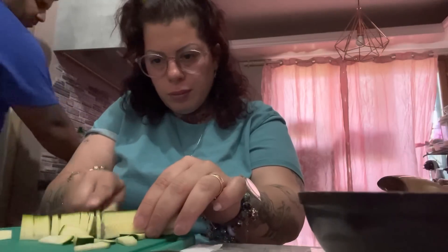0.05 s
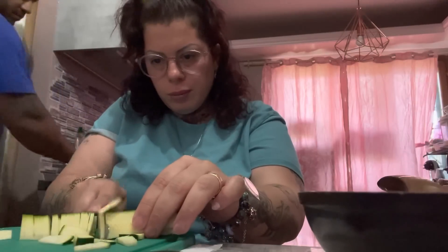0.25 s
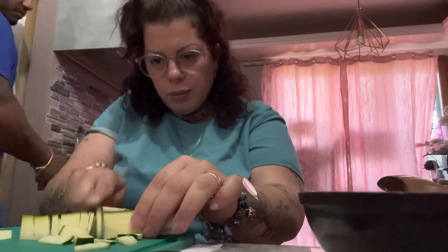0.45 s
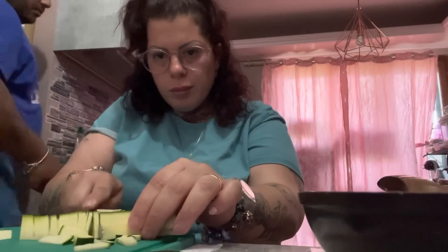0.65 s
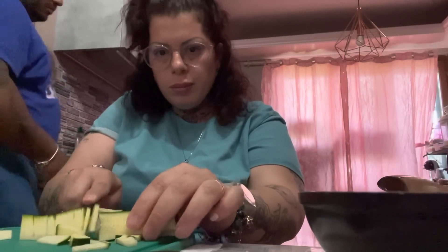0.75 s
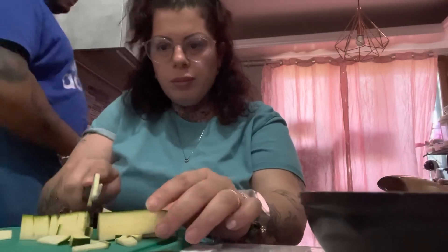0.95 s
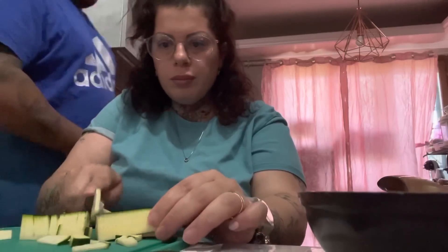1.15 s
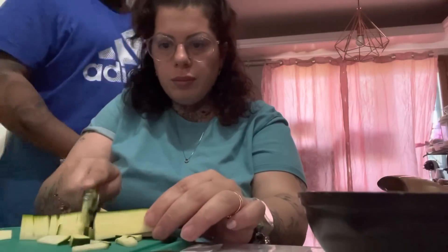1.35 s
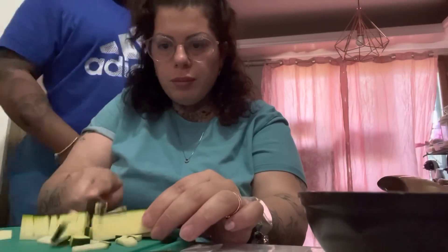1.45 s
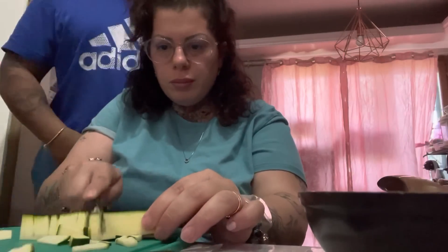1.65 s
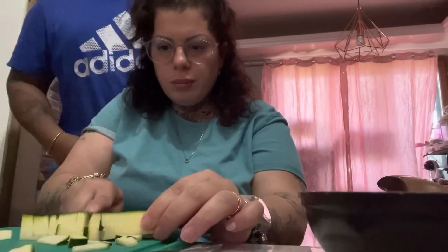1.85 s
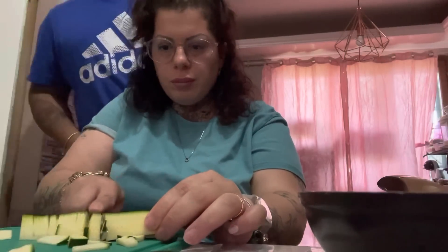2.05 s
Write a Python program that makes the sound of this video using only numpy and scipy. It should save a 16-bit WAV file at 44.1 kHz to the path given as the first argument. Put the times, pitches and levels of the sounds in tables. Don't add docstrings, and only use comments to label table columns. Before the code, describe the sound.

Very close stereo microphone by a cutting board: a fading chop, two quick crunchy knocks, a quiet gap, a heavy chop and a last duller one as a hollow vessel is set down in the kitchen behind.

```python
import sys
import numpy as np
from scipy import signal
from scipy.fft import rfft, irfft, next_fast_len
from scipy.io import wavfile
from scipy.ndimage import uniform_filter1d

SR = 44100
rng = np.random.default_rng(int(sys.argv[2]) if len(sys.argv) > 2 else 0)


def master(y):
    cut = np.clip(np.atleast_2d(y).T, -1, 1)
    pcm = np.round(cut * 32767)
    wavfile.write(sys.argv[1], SR, pcm.astype(np.int16))


def magnitude_from_level(level_db):
    exponent = np.asarray(level_db, float) / 20
    return 10 ** exponent


N = 92610

# start_s, room_db, low_mode_db
CHOPS = [
    (-.03, 6, 0),
    (0.2472, 5.5, -21),
    (0.4892, 3.5, 4),
    (1.2133, 6, 11),
    (1.7793, 2.5, 8),
]
# peak_db, brightness_db_per_octave, treble_db
CHOP_LEVELS = ((-2, 0, 0), (-.5, 1, -14), (-1.5, 0, -3), (-1.3, 1.5, 3), (-9.5, -7.5, 9))
# pitch_hz, level_db, t60_s
BOARD_MODES = [(742, -17, 0.046), (1215, 6, 0.015), (1956, 1, 0.014), (2430, -10, 0.014),
               (2750, -12, 0.009), (3050, -9.5, 0.0066), (3783, -18.5, 0.011), (4300, -23, 0.011),
               (5330, -29.5, 0.0087), (6414, -20, 0.0078), (8020, -18.5, 0.0067), (11000, -27, 0.0013)]
# start_s, length_s, level_db,
# centre_hz, width_octaves
SLICES = [(0.185, 0.025, -50, 2045, 1.4), (0.213, 0.0098, -34, 9460, 1.7), (0.217, .03, -43, 4030, 0.47),
          (0.222, 0.016, -44, 8930, 1.5), (0.449, 0.0039, -74, 13240, 0.2),
          (1.041, 0.0043, -66.5, 11000, 0.79), (1.174, 0.0037, -52.5, 2500, 0.89),
          (1.533, 0.025, -49, 1060, 0.15), (1.551, 0.081, -54, 830, 0.15), (1.394, 0.067, -68, 7760, 1.2),
          (1.502, 0.017, -44, 4300, 0.41), (1.523, 0.0053, -46, 4500, 1.1),
          (1.501, 0.03, -53.5, 9200, 0.91), (1.772, 0.003, -44.5, 6260, 0.79),
          (1.932, 0.015, -58, 6640, 0.11), (0.674, 0.021, -87, 4960, 1.05), (0.919, 0.047, -71, 6580, 0.42),
          (.477, .011, -38, 1900, .45),
    (1.2, .012, -36, 1800, .45),
]
# start_s, level_db, pitch_hz
TICKS = [(.655, -33, 800), (.694, -39, 3000), (.921, -39, 900), (1.0797, -40, 2500), (1.461, -38, 3200),
         (1.4655, -41, 4200), (1.482, -40, 3200), (1.4855, -43, 4000), (1.645, -30, 1300), (.212, -27, 900),
         (.2255, -24, 1000), (1.5045, -30, 4600), (1.506, -29, 2600), (1.508, -26, 4200),
         (1.513, -31, 2200), (1.518, -30, 5000), (1.525, -33, 4400), (.277, -29, 1900), (.2855, -33, 3600),
         (.326, -28, 1100), (.356, -34, 2900), (1.2235, -30, 3200), (1.242, -27, 1600), (.497, -24, 1200),
         (.518, -27, 1300)]
# start_s, level_db, pitch_hz, t60_s
THUMPS = [(.0, -50, 94.3, 0.32), (0.274, -47.5, 77.3, 0.59), (0.383, -42, 70, 0.31),
          (0.488, -31.5, 143, 0.054), (0.504, -41, 83.5, 0.35), (0.099, -55, 73.6, .5),
          (0.656, -44, 76.4, 0.11), (.8, -55.5, 61, 0.36), (1.099, -56.5, 87.6, 0.23),
          (1.179, -39.5, 164.4, 0.066), (1.215, -29.5, 121, 0.041), (1.227, -42, 84, 0.21),
          (1.40, -51.5, 84.7, 0.69), (1.467, -38, 88.5, 0.2), (1.504, -37.5, 94, 0.085),
          (1.616, -39, 76.8, 0.77), (1.798, -41.5, 65.8, 0.36)]
# start_s, level_db, hold_s, fade_db_per_s, tilt_db_per_octave
CLATTERS = [
    (0.091, -44.5, 0.063, 169, -4.5),
    (0.203, -27.5, 0.076, 113, 1.5),
    (.29, -34, 0.077, 166, -3),
    (0.647, -44, 0.027, 115, -2.5),
    (0.788, -50, 0.028, 106, -2.5),
    (1.095, -52.5, 0.022, 189, -4.5),
    (1.499, -49, 0.087, 95, 0.5),
    (1.628, -56.5, 0.093, 50, -4),
    (1.766, -28, 0.028, 151, -2),
]
# pitch_hz, width_hz, level_db
BODIES = [(218, 152, 2.5), (302.4, 18, -6), (400, 13, -6), (611.6, 11, 6.5), (786, 132, 3.5), (892, 22, 2),
          (1130, 160, -5.5), (1360, 155, -9), (1850, 160, -22.5), (3600, 540, -23), (8520, 500, -21)]
VESSEL_TOUCHES = (1.767, 1.785, 1.796, 1.806)
# pitch_hz, level_db, t60_s
VESSEL_MODES = [(281, -5, 0.18), (409.4, 3.5, 0.1), (489.5, -8, 0.48), (646, 2, 0.21), (793, -7, 0.043),
                (894, -3, 0.11)]
# start_s, hold_s, level_db, fade_db_per_s
STEEL_HIT = (.211, .022, -35, 500)
PAN_HIT = (.3, .06, -37, 200)
# pitch_hz, width_hz, level_db
STEEL_MODES = [(1810, 60, -8), (2910, 90, -10), (3680, 60, -3), (4840, 200, -9), (5500, 200, -11),
               (6100, 60, -7), (7660, 90, -1), (9390, 90, -10), (10700, 60, -11), (11700, 60, -8),
               (12800, 150, -10)]
PAN_MODES = [(220, 18, -1.5), (328, 6.4, -10), (589, 14, -5.5), (754, 25, -5.5), (960, 31, -13)]
# (centre_hz, width_hz, level_db)
SCUFFS = [((1, -2, -33, 491), (3600, 500, 0)), ((1.503, .03, -45, 600), (2100, 1200, 0)),
          ((3.7, -5.5, -39, 250), (655, 65, 0)), ((0.2, -0.17, -51.5, 150), (910, 270, 0)),
          ((-3, 0.3, -62, 600), (15500, 450, 0)), ((2, 0.26, -55, 600), (15400, 630, 0)),
          ((-1.5, 0.2, -72, 603), (15500, 500, 0)), ((-3.3, 0.3, -72, 600), (15500, 460, 0)),
          ((1.7, 1, -76.5, 600), (8900, 430, 0)), ((-3.5, 0.7, -59, 900), (8500, 1900, 0))]
# frequency_hz, level_db
HUSH_COLOUR = [(18, -43.5), (30, -12.5), (107, -2.5), (562, -4), (953, -8.5), (2470, -16.5), (4650, -26),
               (10300, -28.5), (16500, -52)]
# time_s, level_db
HUSH_LEVEL = [(0, -58), (.15, -60), (0.399, -60.5), (.6, -64.5), (.75, -65.5), (.9, -68), (1.0, -71),
              (1.08, -69), (1.164, -80), (1.202, -47), (1.341, -67.5), (1.42, -60), (1.57, -64.5),
              (1.75, -59), (2.1, -64.5)]
# frequency_hz, t60_s
ROOM_DECAY = [(100, 0.11), (700, 0.54), (1500, 0.38), (3000, 0.38), (6000, 0.63), (12000, 0.202)]
# frequency_hz, left_lead_radians
LEAD_NEAR = [(30, 0), (340, .7), (700, 2), (1000, .7), (3000, .7)]
# frequency_hz, left_lead_radians
LEAD_AROUND = [(30, 0), (340, .7), (700, 2.4), (1300, 1.5), (3000, 2)]
# frequency_hz, left_lead_radians
LEAD_HIGH = [(6100, 1.2), (7600, 2), (8300, np.pi), (9700, np.pi), (10500, 2 * np.pi), (12700, 2 * np.pi),
             (13300, 3 * np.pi), (15000, 3 * np.pi), (15300, 8), (17000, 8)]
# frequency_hz, likeness_0_to_1
LIKENESS = [(60, .7), (300, .6), (1000, .3), (4000, .5), (7000, .8), (8200, .997)]
# frequency_hz, left_minus_right_db
PORT_TILT = [(60, -5), (300, -5), (700, -1), (1500, 1), (4000, -1.5), (8000, 0)]

RISE_S = 0.0007


def chops():
    bounce_s, bounce_db = 0.0027, -12
    room_bright_db, room_damp = -7.5, 0.4
    direct, reverberant = np.zeros(N), np.zeros((2, N))
    for (s, room_db, low_db), (db, bright_db, treble_db) in zip(CHOPS, CHOP_LEVELS):
        start = s - 3 * RISE_S
        ring = magnitude_from_level(db) * board(bright_db, treble_db, low_db, 0.98)
        add(direct, start, ring)
        add(direct, start + bounce_s, magnitude_from_level(bounce_db) * ring)
        into_room = board(room_bright_db, treble_db, low_db, room_damp)[None]
        tail = signal.fftconvolve(into_room, room(), axes=1)
        add(reverberant, start, magnitude_from_level(db + room_db) * tail)
    return direct, reverberant


def board(bright_db, treble_db, low_db, damp):
    t = np.arange(2000) / SR - 3 * RISE_S
    ring = np.zeros(len(t))
    for hz, db, t60 in BOARD_MODES:
        level = db + low_db * (hz < 1000) + treble_db * (hz > 5000) + bright_db * np.log2(hz / 2000)
        decay = magnitude_from_level(level - 60 * np.maximum(t, 0) / (t60 * damp))
        rise_s = RISE_S * min(hz / 2400, 1) ** 2
        rise = np.exp(-(np.minimum(t, 0) / rise_s) ** 2)
        ring += decay * rise * np.sin(2 * np.pi * hz * t)
    return ring / abs(ring).max()


def slices():
    grit_db, tail_s, tail_db = 2, 0.15, -5
    out, t = np.zeros((2, N)), np.arange(SR // 2) / SR
    for s, length, db, hz, octaves in SLICES:
        noise = rng.standard_normal((2, len(t)))
        lumps = evened(uniform_filter1d(rng.standard_normal(len(t)), 120))
        grit = noise * magnitude_from_level(grit_db * lumps)
        grit = evened(shaped(grit, lambda f: np.exp(-.5 * (np.log2((f + 1) / hz) / octaves) ** 2)))
        after = np.maximum(t - length, 0)
        onset = np.minimum(t / np.clip(length / 8, .002, .006), 1)
        fade = magnitude_from_level(-3000 * after) + magnitude_from_level(tail_db - 60 * after / tail_s)
        add(out, s, grit * magnitude_from_level(db) * onset * fade)
    return out


def ticks():
    out, t = np.zeros(N), np.arange(600) / SR
    for s, db, hz in TICKS:
        cycles = t * hz
        add(out, s, magnitude_from_level(db + 6 - 16 * cycles) * (1 - np.exp(-6 * cycles)) * np.sin(2 * np.pi * cycles))
    return out


def thumps():
    out, t = np.zeros(N), np.arange(SR // 2) / SR
    for s, db, hz, t60 in THUMPS:
        envelope = magnitude_from_level(db + 6.5 - 60 * t / t60) * (1 - np.exp(-(t * hz / 0.32) ** 2))
        tone = np.sin(2 * np.pi * hz * t)
        tone += 0.32 * np.sin(2 * np.pi * 1.3 * hz * t)
        tone += 0.38 * np.sin(2 * np.pi * 2.78 * hz * t) * magnitude_from_level(-300 * t)
        add(out, s, envelope * tone)
    return out


def clatters():
    out, t = np.zeros((2, N)), np.arange(SR * 3 // 4) / SR
    for s, db, hold, fade_db, tilt_db in CLATTERS:
        shift = rng.uniform(0.81, 1.03)

        def body(f):
            power = sum(magnitude_from_level(2 * d) / (1 + (2 * (f - hz * shift) / w) ** 2) for hz, w, d in BODIES)
            bass_cut = f ** 2 / (f ** 2 + 150 ** 2)
            return magnitude_from_level(tilt_db * np.log2((f + 50) / 600)) * np.sqrt(power) * bass_cut

        noise = rng.standard_normal((2, len(t)))
        clumps = evened(uniform_filter1d(rng.standard_normal(len(t)), 250))
        knocks = noise * magnitude_from_level(1.37 * clumps)
        envelope = np.minimum(t / 0.0091, 1) * magnitude_from_level(db - fade_db * np.maximum(t - hold, 0))
        add(out, s, evened(shaped(knocks, body)) * envelope)
    return out


def vessel():
    touch_db = -30.5
    out, t = np.zeros((2, N)), np.arange(SR // 3) / SR
    for s in VESSEL_TOUCHES:
        phases = rng.uniform(0, 2 * np.pi, (len(VESSEL_MODES), 2, 1))
        ring = np.zeros((2, len(t)))
        for (hz, db, t60), phase in zip(VESSEL_MODES, phases):
            ring += magnitude_from_level(touch_db + db - 60 * t / t60) * np.sin(2 * np.pi * hz * t + phase)
        add(out, s, np.minimum(t / 0.00095, 1) * ring)
    return out


def scraped(hit, modes):
    s, hold, db, fade_db = hit
    out, t = np.zeros((2, N)), np.arange(SR // 2) / SR

    def resonance(f):
        return np.sqrt(sum(magnitude_from_level(2 * d) / (1 + (2 * (f - hz) / w) ** 2) ** 2 for hz, w, d in modes))

    ring = evened(shaped(rng.standard_normal((2, len(t))), resonance))
    add(out, s, ring * np.minimum(t / 0.0021, 1) * magnitude_from_level(db - fade_db * np.maximum(t - hold, 0)))
    return out


def scuffs():
    return sum(scraped(hit, [band]) for hit, band in SCUFFS)


def air():
    hush = evened(shaped(rng.standard_normal((2, N)), lambda f: magnitude_from_level(read(HUSH_COLOUR, f))))
    level_db = 10.5 + np.interp(np.arange(N) / SR, *np.transpose(HUSH_LEVEL))
    wander_db = 3.4 * evened(uniform_filter1d(rng.standard_normal(N), 3000))
    return hush * magnitude_from_level(level_db + wander_db)


def room():
    room_db, early_db, early_s = -13, 7.5, 0.014
    taps = np.zeros((2, SR))
    at = np.arange(200, SR - 20, 20) + rng.integers(0, 20, (2, (SR - 201) // 20))
    np.put_along_axis(taps, at, rng.choice([-1., 1.], at.shape), 1)
    hz, t, bands = signal.stft(taps, SR, nperseg=256)
    decay_db = early_db * np.exp(-t / early_s) - 60 * t / read(ROOM_DECAY, hz)[:, None]
    tail = signal.istft(bands * magnitude_from_level(decay_db), SR, nperseg=256)[1]
    return tail * magnitude_from_level(room_db) / np.linalg.norm(tail[0])


def ports(pair, lead, like):
    n = next_fast_len(N + 4096)
    hz = np.fft.rfftfreq(n, 1 / SR)
    a, b = rfft(pair, n)
    common = np.clip(read(like, hz), 0, 1)
    gain = magnitude_from_level(read(PORT_TILT, hz) / 2)
    lag = np.exp(-1j * np.interp(hz, *np.transpose([*lead, *LEAD_HIGH])))
    left = a * gain
    right = (common * a + np.sqrt(1 - common ** 2) * b) / gain * lag
    return irfft([left, right], n)[:, :N]


def read(points, hz):
    f, v = np.transpose(points)
    return np.interp(np.log(hz + 1), np.log(f + 1), v)


def evened(x):
    return x / np.sqrt(np.mean(x ** 2, -1, keepdims=True) + 1e-20)


def add(mix, s, sound):
    i = round(s * SR)
    sound = sound[..., max(-i, 0):]
    part = mix[..., max(i, 0):][..., :sound.shape[-1]]
    part += sound[..., :part.shape[-1]]


def shaped(x, gain):
    n = x.shape[-1]
    return irfft(rfft(x) * gain(np.fft.rfftfreq(n, 1 / SR)), n)


def scene():
    direct, reverberant = chops()
    near = np.array([direct + thumps() + ticks(), np.zeros(N)])
    around = reverberant + slices() + clatters() + vessel() + air()
    around += scraped(STEEL_HIT, STEEL_MODES) + scraped(PAN_HIT, PAN_MODES) + scuffs()
    return ports(near, LEAD_NEAR, [(10, 1.0), (20000, 1)]) + ports(around, LEAD_AROUND, LIKENESS)


def low_pass(x):
    return signal.sosfilt(signal.butter(12, 16980, fs=SR, output="sos"), x)


def record(dry):
    mix = shaped(dry, lambda f: f ** 2 / (f ** 2 + 31.0 ** 2) / (1 + (f / 16000) ** 60))
    return low_pass(mix)


dry = scene()
out = record(dry)
master(out)
```